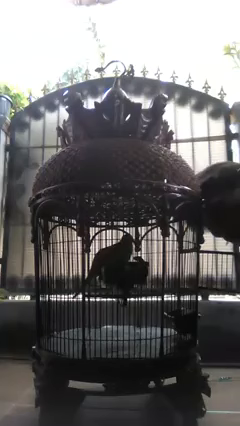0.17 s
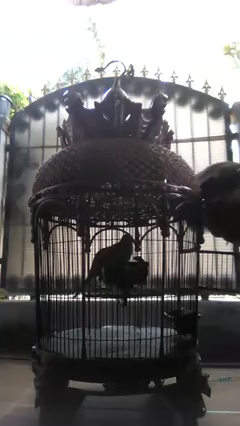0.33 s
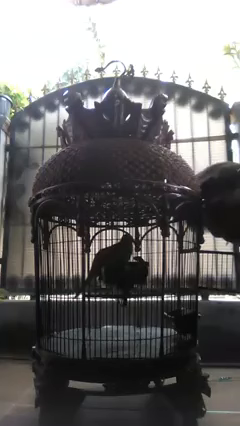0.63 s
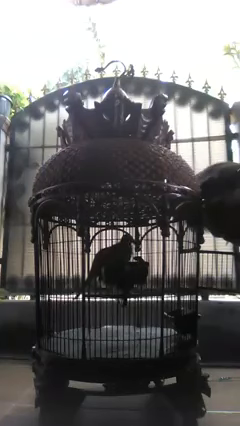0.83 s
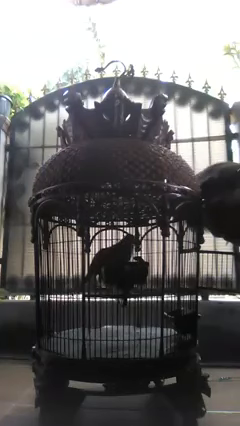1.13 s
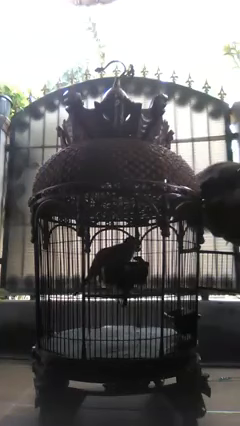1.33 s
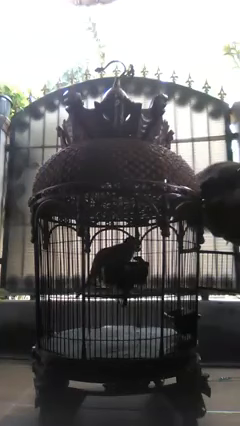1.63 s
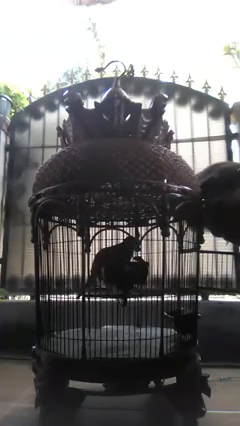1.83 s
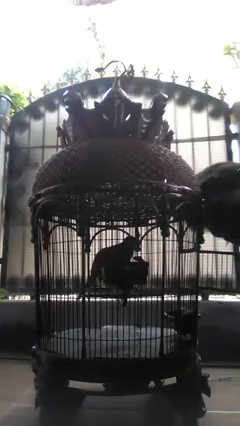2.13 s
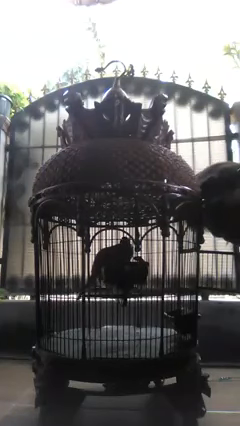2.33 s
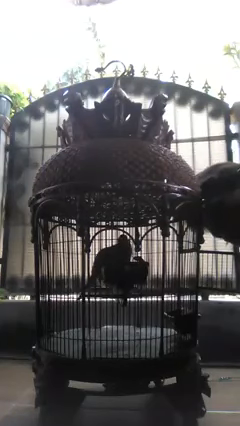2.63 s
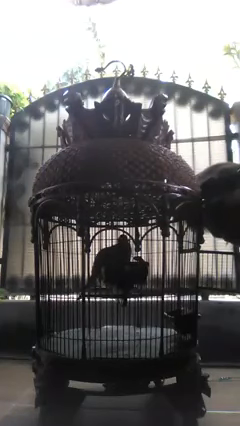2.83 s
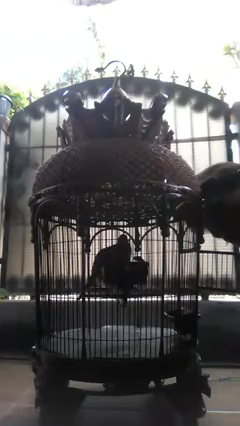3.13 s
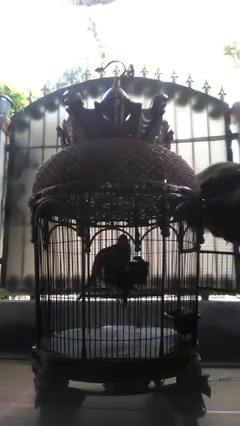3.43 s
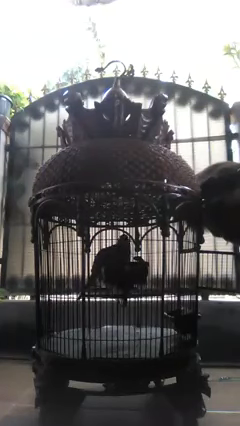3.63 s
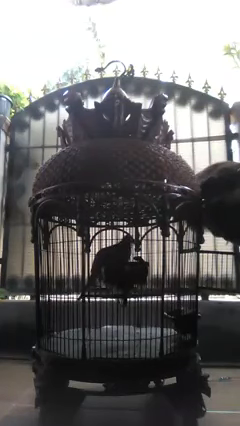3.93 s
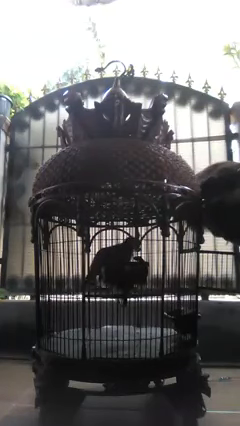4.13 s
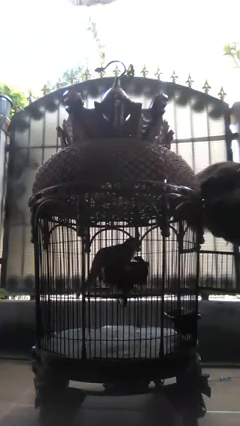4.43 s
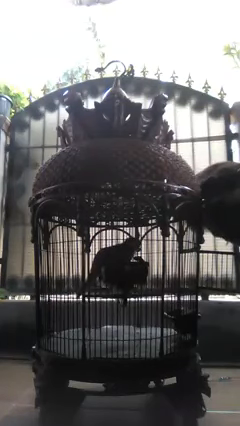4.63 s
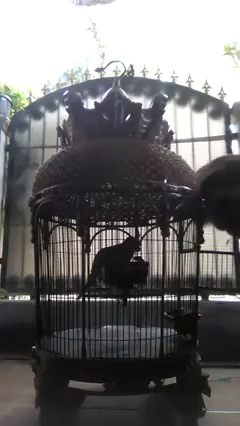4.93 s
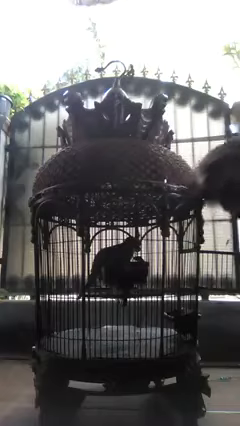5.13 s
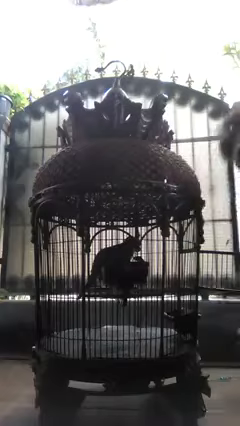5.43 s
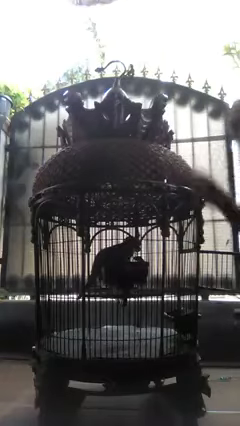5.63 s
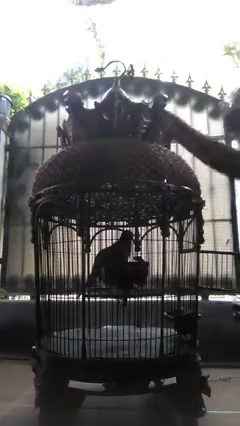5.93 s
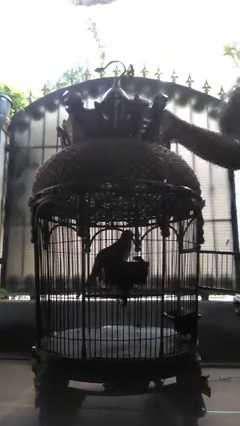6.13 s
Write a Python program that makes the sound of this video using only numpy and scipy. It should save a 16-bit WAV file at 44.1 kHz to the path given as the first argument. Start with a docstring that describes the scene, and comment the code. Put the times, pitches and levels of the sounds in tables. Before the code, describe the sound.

On a walled porch, a caged dove close to the microphone gives two loud rolling coos about three seconds apart, each a quick run of upward-swooping notes with an echo. A second dove answers softly between them, and a third hoots far off afterward. A small bird chirps about twice a second throughout. Near the end someone shifts with a cloth rustle and a soft thump, over a quiet outdoor rumble.

```python
"""A caged zebra dove gives two loud rolling coos on a walled porch. Each note swoops up in pitch,
shaped by the inflated throat, and echoes off the near walls. A second dove answers softly and a
third hoots far off. A small bird chirps in quick, buzzy slurs about twice a second, with faint
rasps and whistles behind it. Someone shifts beside the cage (cloth noise and a soft thump),
over a quiet outdoor rumble."""
import sys
import numpy as np
from scipy import signal
from scipy.fft import rfft, irfft, next_fast_len
from scipy.io import wavfile
from scipy.ndimage import map_coordinates

SR = 44100
rng = np.random.default_rng(int(sys.argv[2]) if len(sys.argv) > 2 else 0)


def wrap_up_sound(samples):
    """Save the sound to the file named by the first command line argument, as 16-bit audio."""
    columns = np.atleast_2d(samples).T
    # keep every value between -1 and 1, then stretch to whole-number steps
    tamed = np.clip(columns, -1, 1)
    steps = np.round(tamed * 32767).astype(np.int16)
    wavfile.write(sys.argv[1], SR, steps)


N = 277168

# throat resonance: f/Hz, gain/dB
THROAT = [(470, -34), (620, -18.5), (800, -8.5), (950, 1.5), (1080, 1), (1220, -1), (1300, -3)]
def caged_dove():
    """Two loud calls, each led by a beak tick and a hoarse onset, with their porch echoes."""
    voice = coo_notes(rolling_calls(roll_notes=4), THROAT, depth=.6, jitter=.0068, rough_rad=.25,
                      jump_db=2.5, overtone_db=1, husk_db=-30)
    voice += hoarse_onsets(lead_s=.032, length_s=.046, gain_db=-13.5)
    voice += beak_ticks()
    return voice + porch_echoes(voice)


# calls: t/s (end of first upsweep), time stretch, level/dB
CALLS = [(1.449, 1.0, -30.8), (4.350, 1.04, -30.3)]
# note kinds: length/s, upsweep/s, pitch lift/Hz, final sag/fraction, accent/dB
OPENING = (.078, .030, 10, .04, 1.2)
ROLLING = (.059, .018, 6, .12, 0)
CLOSING = (.106, .025, 46, .06, -.8)
AFTERNOTE = (.038, .0027, -12, .2, -2.4)
def rolling_calls(roll_notes):
    """Notes of the calls: opening swoop, a roll that slows and droops, long note, short afternote."""
    gap_s, slowing_s, afternote_gap_s = .053, .0011, .089
    top_hz, droop_hz_per_note, fade_db_per_note = 1223, 13, .1
    kinds = [OPENING] + [ROLLING] * roll_notes + [CLOSING, AFTERNOTE]
    gaps_s = [gap_s + slowing_s * k ** 3 for k in range(roll_notes + 1)] + [afternote_gap_s]
    beats_s = np.cumsum([0] + gaps_s)
    notes = []
    for call_s, stretch, call_db in CALLS:
        for k, (length_s, upsweep_s, lift_hz, sag, accent_db) in enumerate(kinds):
            start_s = call_s + stretch * beats_s[k] - upsweep_s
            hz = top_hz - droop_hz_per_note * k + lift_hz
            db = call_db - fade_db_per_note * k + accent_db
            notes.append((start_s, length_s, hz, upsweep_s, sag, db))
    return notes


def hoarse_onsets(lead_s, length_s, gain_db):
    """Each call starts as hoarse noise before the tone takes hold."""
    effort = np.zeros(N)
    burst = gate(clock(length_s), length_s, attack_s=.013, release_s=.019)
    for call_s, _, call_db in CALLS:
        add(effort, call_s - lead_s, amp(call_db + gain_db) * burst)
    return effort * noise([(300, -25), (600, -6), (900, 4.5), (1250, -7.5), (1700, -5),
                           (2200, -29.5), (2800, -24.5), (4000, -40), (9000, -57.5)])


# coo overtones: harmonic number, relative level/dB
OVERTONES = [(2, -24), (3, -25), (4, -37), (5, -32), (7, -49)]
# husky airflow spectrum: f/Hz, relative level/dB
HUSK = [(300, -25.5), (900, -3.5), (1700, 13.5), (2800, -13), (3600, 6), (5000, -16), (6300, 3),
        (7000, -20.5), (8700, -13.5), (9800, -30.5), (12000, -21.5), (15000, -37)]
def coo_notes(notes, throat, depth, jitter, rough_rad, jump_db, overtone_db, husk_db):
    """Each note swoops up and sags; the inflated throat favours the high part of the swoop."""
    jump_delay_s, jump_rise_s, jump_fade_s = .013, .002, .013
    voice, airflow = np.zeros((2, N))
    for start_s, length_s, top_hz, upsweep_s, sag, db in notes:
        t = clock(length_s)
        low = np.exp(-(t / upsweep_s) ** 3)  # 1 at the foot of the swoop, 0 at its top
        hz = top_hz * (1 - depth * low) * (1 - sag * (t / length_s) ** 4.6)
        phase = phase_of(hz * (1 + jitter * wobble(t, 450))) + rough_rad * low * wobble(t, 600)
        effort = amp(db) * gate(t, length_s, attack_s=.0072, release_s=.01)
        is_afternote = upsweep_s < .006
        brightness = amp(overtone_db - 9.3 * low - 19 * (t / length_s) ** 5 - 8.8 * is_afternote)
        overtones = np.zeros(len(t))
        for k, harmonic_db in OVERTONES:
            gain = amp(harmonic_db - 3 * (k - .5) * low + 2.2 * wobble(t, 300))
            overtones += gain * np.sin(k * phase + .5 * wobble(t, 350))
        # just after the swoop the level dips, jumps and eases, as when a wall echo arrives
        since_s = t - upsweep_s - jump_delay_s
        dip = np.clip(1 + since_s / jump_delay_s, 0, 1) * np.clip(1 - since_s / jump_rise_s, 0, 1)
        jump = np.clip(since_s / jump_rise_s, 0, 1) * np.exp(-np.maximum(since_s, 0) / jump_fade_s)
        fundamental = amp(along(throat, hz) + jump_db * (jump - dip)) * np.sin(phase)
        add(voice, start_s, effort * (fundamental + brightness * overtones))
        add(airflow, start_s, effort * brightness * (1 + 4 * low * (1 - low)))  # husky mid-swoop
    return voice + amp(husk_db) * airflow * noise(HUSK)


# beak ticks: t/s, level/dB
TICKS = [(1.364, -51), (4.269, -52)]
def beak_ticks():
    """A tick of the beak before each call, followed by a faint short tone."""
    tick_t60_s, hum_t60_s, hum_hz, hum_db = .022, .15, 1110, -9.5
    ticks, hum = np.zeros((2, N))
    t = clock(.05)
    tone = gate(t, .05, attack_s=.011, release_s=.01) * np.sin(2 * np.pi * hum_hz * t)
    for start_s, db in TICKS:
        add(ticks, start_s, amp(db - 60 * t / tick_t60_s))
        add(hum, start_s, amp(db + hum_db - 60 * t / hum_t60_s) * tone)
    return hum + ticks * noise([(300, -12), (600, -8.5), (1750, 2.5), (2400, -19), (4000, -14),
                                (7000, -32), (14000, -47)])


# near-wall reflections: delay/s, gain/dB
WALLS = [(.015, -3), (.0159, -3), (.0239, -7), (.0326, -9), (.0335, -7.5), (.0414, -7), (.0978, -11),
         (.1126, -11.5)]
# colour of the diffuse porch echo: f/Hz, gain/dB
BOOM = [(500, -6.5), (780, -10.5), (900, 0), (1080, -3), (1220, -0.5), (1600, -8.5), (2400, -7.5),
        (3600, -2.5), (6000, -22.5)]
def porch_echoes(voice):
    """The coo's fundamental bounces off the near walls; its overtones mostly beam straight out."""
    spread = coloured(voice, [(550, -16), (750, -8.5), (900, 1), (1250, 1), (1450, -12),
                              (2400, -13.5), (6000, -11.5)])
    echoes = np.zeros(N)
    for delay_s, db in WALLS:
        add(echoes, delay_s, amp(db) * spread)
    return echoes + amp(-5) * reverb(coloured(voice, BOOM), build_s=.055)


# answering notes: t/s, length/s, top f/Hz, level/dB
ANSWER = [(2.254, 0.14, 1210, -41.5), (2.413, 0.065, 1172, -45.5), (2.491, .048, 1154, -45),
          (2.585, 0.0684, 1152, -44.5), (2.730, 0.078, 1205, -44.5)]
def answering_dove():
    """A softer, purer phrase from farther along the porch; longer notes lift more slowly."""
    throat = [(850, -20.5), (930, 7.5), (1030, -.5), (1120, 2), (1200, 5)]  # f/Hz, gain/dB
    base_upsweep_s, upsweep_per_length, sag = .0187, .12, .036
    notes = [(start_s, length_s, hz, base_upsweep_s + upsweep_per_length * length_s, sag, db)
             for start_s, length_s, hz, db in ANSWER]
    voice = coo_notes(notes, throat, depth=.27, jitter=.0055, rough_rad=.055,
                      jump_db=0, overtone_db=-26, husk_db=-61)
    far_wall = np.zeros(N)
    add(far_wall, .034, amp(-9.5) * voice)
    return amp(-1.5) * voice + far_wall + amp(-8) * reverb(voice, build_s=.0032)


# far dove's hoots, far whistles: t/s, length/s, f/Hz, glide/fraction, level/dB
HOOTS = [(4.955, 0.088, 909.3, 0.0108, -44.5), (5.225, 0.042, 905, 0.016, -39.5),
         (5.32, 0.0775, 904.5, -0.024, -49.5), (6.07, 0.084, 916, 0.018, -54),
         (6.14, 0.19, 935, 0.011, -46.5)]
WHISTLES = [(4.42, 0.31, 2020, 0.048, -67), (4.74, 0.19, 2130, -0.035, -67.5),
            (5.05, 0.326, 2030, -.01, -72.5), (5.56, 0.25, 1985, -0.0382, -71.5)]
def far_birds():
    """A third dove's hoots and some faint whistles, half lost in their echo."""
    hoots = glides(HOOTS, waver=.025, roll_db=6, roll_hz=30.4)
    whistles = glides(WHISTLES, waver=.0089, roll_db=5.5, roll_hz=18)
    voice = hoots + whistles
    return amp(2.5) * voice + amp(.5) * reverb(voice, build_s=.026)


def glides(notes, waver, roll_db, roll_hz):
    """Slowly gliding tones; the long ones roll in loudness."""
    voice = np.zeros(N)
    for start_s, length_s, first_hz, glide, db in notes:
        t = clock(length_s)
        hz = first_hz * (1 + glide * t / length_s + waver * wobble(t, 61))
        tremolo_db = -roll_db * np.cos(2 * np.pi * roll_hz * t) * (length_s > .1)
        effort = amp(db + tremolo_db) * gate(t, length_s, attack_s=.026, release_s=.0067)
        add(voice, start_s, effort * np.sin(phase_of(hz)))
    return voice


# chirp onsets: t/s
CHIRP_TIMES_S = [0.292, .697, 1.232, 1.671, 2.07, 2.533, 2.957, 3.357, 3.822, 4.28, 4.685, 5.156, 5.629,
                 6.059]
# slurs: length/s, first f/Hz, last f/Hz, bend exponent, added jitter/fraction, level/dB
RISING = (.06, 3720, 5540, .85, .003, -58.5)
FALLING = (.075, 4900, 3230, 1.35, .026, -56)
def chirping_bird():
    """Buzzy slurs, one up then two down, growing to full voice; the falling ones turn hoarse."""
    warm_up_s, warm_up_db = 2.9, 8
    corner_hz, rolloff_db_per_octave = 3760, 7.5
    voice = np.zeros(N)
    for start_s, slur in zip(CHIRP_TIMES_S, [RISING, FALLING, FALLING] * len(CHIRP_TIMES_S)):
        length_s, first_hz, last_hz, bend, added_jitter, db = slur
        t = clock(length_s)
        hz = (first_hz + (last_hz - first_hz) * (t / length_s) ** bend) * (1 + .005 * wobble(t, 40))
        jitter = .0078 + added_jitter * t / length_s
        phase = phase_of(hz * (1 + jitter * wobble(t, 700)))
        reediness = amp(-32) * np.clip((4300 - hz) / 300, 0, 1)
        tone = np.sin(phase) + reediness * np.sin(3 * phase)
        effort = amp(db - warm_up_db * max(1 - start_s / warm_up_s, 0) + 2 * wobble(t, 150))
        rolloff = amp(-rolloff_db_per_octave * np.maximum(np.log2(hz / corner_hz), 0))
        add(voice, start_s, effort * rolloff * gate(t, length_s, attack_s=.016, release_s=.0052) * tone)
    # nearby surfaces smear each slur before the long echo takes over
    t = clock(.125)
    scatter = rng.standard_normal(len(t)) * amp(-60 * t / .055)
    smear = signal.fftconvolve(voice, scatter / np.linalg.norm(scatter))[:N]
    return amp(-6) * voice + amp(.5) * smear + amp(3) * reverb(voice, build_s=.0082)


# rasp loudness curve: t/s, level/dB
RASP_LEVEL = [(0, -72.5), (3.55, -73.5), (4.05, -69), (5.55, -69.5), (6.1, -75.5)]
def rasping_bird():
    """A distant hoarse note of band noise, repeated twice a second."""
    first_s, period_s = .06, .499
    effort = np.zeros(N)
    burst = gate(clock(.066), .072, attack_s=.013, release_s=.048)
    for start_s in np.arange(first_s, N / SR, period_s):
        db = np.interp(start_s, *np.transpose(RASP_LEVEL))
        add(effort, start_s, amp(db) * burst)
    voice = effort * noise([(600, -58.5), (1450, -13.5), (1680, -1), (1850, -7), (2030, 2),
                            (2250, -20), (2800, -33.5), (5000, -66)])
    return amp(-1) * voice + amp(3.5) * reverb(voice, build_s=.012)


# cloth rustles, thump, hissy rasp: t/s, swell/s, t60/s, level/dB
RUSTLES = [(.206, 0.019, 0.14, -71), (.44, 0.039, .25, -76), (2.76, .05, 0.34, -77), (3.334, .09, .6, -72),
           (3.93, 0.054, .4, -73), (5.008, 0.061, 0.32, -60.5), (5.108, 0.046, 1, -65),
           (5.6, 0.27, .4, -68)]
THUMP = (5.008, .045, .33, -50.5)
HISSY_RASP = (3.334, .075, .66, -56.5)
# cloth and thump spectra: f/Hz, relative level/dB
CLOTH_SPECTRUM = [(200, -5), (700, -5.5), (1400, 5), (2000, -1), (3000, 0), (4200, 0), (5500, -44),
                  (9000, -26), (15000, -52)]
THUMP_SPECTRUM = [(80, 3), (180, -8), (270, 9), (400, 3.5), (600, 2.5), (1200, -43.5)]
def shuffling_and_rasp():
    """Clothes rustle and someone gets up with a soft thump; separately, a brief hissy rasp."""
    rub = sum(stroke(*rustle, curve=.5) for rustle in RUSTLES) * noise(CLOTH_SPECTRUM)
    # near 3.5 kHz, perhaps a bird's harsh chirp
    rasp = stroke(*HISSY_RASP, curve=.75) * noise([(1500, -31.5), (2400, -9.5), (2900, -1), (3700, 6),
                                                   (4400, -8), (5500, -47.5)])
    flicker = amp(3.2 * wobble(np.arange(N) / SR, 90))
    thump = stroke(*THUMP, curve=3.3) * noise(THUMP_SPECTRUM)
    sound = flicker * (rub + rasp) + thump
    return sound + amp(-7.5) * reverb(sound, build_s=.011)


def stroke(start_s, swell_s, t60_s, db, curve):
    """Envelope that swells and dies away."""
    t = np.arange(N) / SR - start_s
    return amp(db - 60 * np.maximum(t - swell_s, 0) / t60_s) * np.clip(t / swell_s, 0, 1) ** curve


# outdoor noise spectrum: f/Hz, relative level/dB
AIR = [(20, -26.5), (30, -22.5), (42, -4), (60, 0), (100, -8.5), (130, -6), (220, -12.5), (400, -17.5),
       (800, -19.5), (1600, -30), (3500, -24.5), (6300, -36.5), (9000, -35.5), (10200, -41.5),
       (12000, -33.5), (15000, -49)]
def outdoors():
    """Quiet hiss over a rumble that swells and sinks."""
    air = amp(-69) * noise(AIR)
    rumble = filtered(air, lambda hz: 1 / (1 + (hz / 180) ** 4))
    hiss = air - rumble
    return hiss + amp(.66 * wobble(np.arange(N) / SR, 5.8)) * rumble


# porch decay: f/Hz, t60/s
PORCH_T60 = [(200, 0.23), (1000, 0.92), (2200, 0.71), (4000, 0.6), (7000, 0.28), (14000, 0.71)]
def reverb(x, build_s):
    """Diffuse porch echo: it builds up, then each frequency dies at its own rate."""
    hz, t, spectrum = signal.stft(rng.standard_normal(SR), SR, nperseg=256)
    decay = amp(-60 * t / along(PORCH_T60, hz)[:, None])
    build = 1 - np.exp(-t / build_s)
    _, tail = signal.istft(spectrum * decay * build, SR, nperseg=256)
    return signal.fftconvolve(x, tail / np.linalg.norm(tail))[:N]


def amp(db):
    return 10 ** (np.asarray(db) / 20)


def along(points, hz):
    """Interpolate (f/Hz, value) points on a log frequency axis."""
    knots_hz, values = np.transpose(points)
    return np.interp(np.log(hz + 1), np.log(knots_hz + 1), values)


def clock(length_s):
    return np.arange(int(length_s * SR)) / SR


def add(track, start_s, x):
    part = track[max(round(start_s * SR), 0):][:len(x)]
    part += x[:len(part)]


def wobble(t, knots_per_s):
    """Smooth random curve."""
    return map_coordinates(rng.standard_normal(2048), [t * knots_per_s], mode="wrap")


def filtered(x, response):
    """Apply a gain given as a function of f/Hz."""
    size = next_fast_len(len(x) + 8192)
    return irfft(rfft(x, size) * response(np.fft.rfftfreq(size, 1 / SR)), size)[:len(x)]


def coloured(x, points):
    """Filter by (f/Hz, gain/dB) points."""
    return filtered(x, lambda hz: amp(along(points, hz)))


def noise(spectrum):
    """Noise of rms 1, shaped by (f/Hz, relative level/dB) points."""
    x = coloured(rng.standard_normal(N), spectrum)
    return x / np.sqrt(np.mean(x ** 2) + 1e-20)


def gate(t, length_s, attack_s, release_s):
    """Sine-squared fade in and out."""
    rise = np.sin(np.pi / 2 * np.clip(t / attack_s, 0, 1)) ** 2
    fall = np.sin(np.pi / 2 * np.clip((length_s - t) / release_s, 0, 1)) ** 2
    return rise * fall


def phase_of(hz):
    return 2 * np.pi * np.cumsum(hz) / SR


def scene():
    """Mono mix of birds, movement and outdoor noise."""
    birds = caged_dove() + answering_dove() + far_birds() + chirping_bird() + rasping_bird()
    return (birds + shuffling_and_rasp() + outdoors())[None]


def record(dry):
    """Brick-wall low-pass."""
    cutoff_hz = 15700
    return filtered(dry[0], lambda hz: hz < cutoff_hz)[None]


dry = scene()
out = record(dry)
wrap_up_sound(out)
```